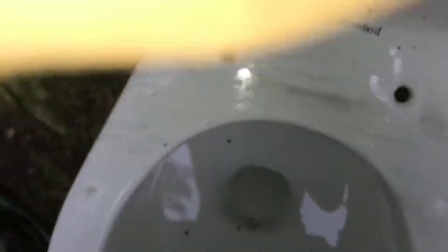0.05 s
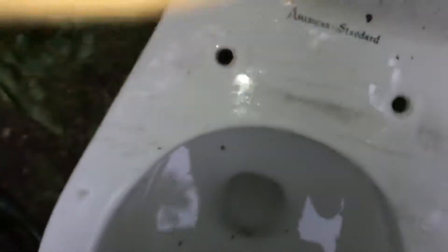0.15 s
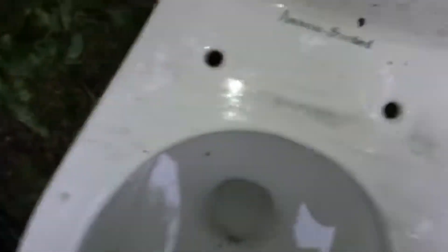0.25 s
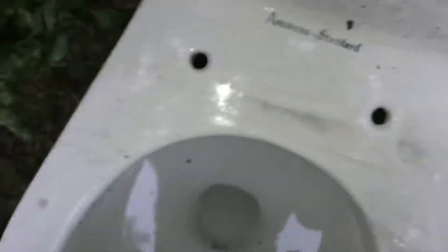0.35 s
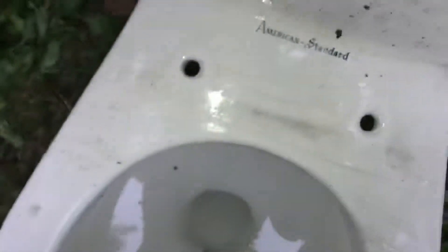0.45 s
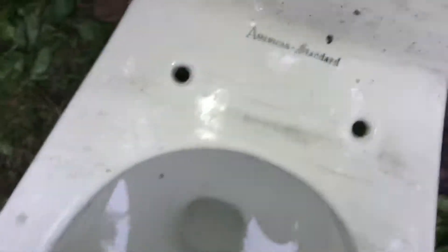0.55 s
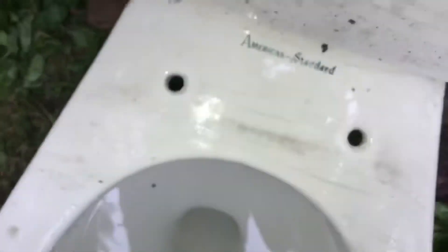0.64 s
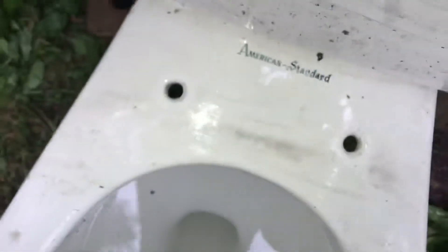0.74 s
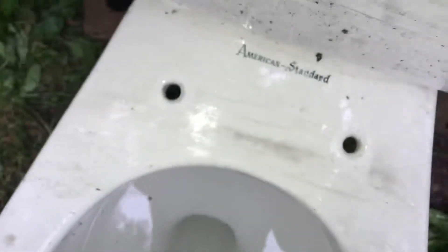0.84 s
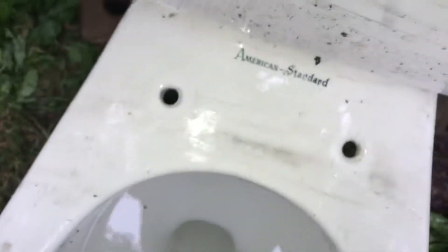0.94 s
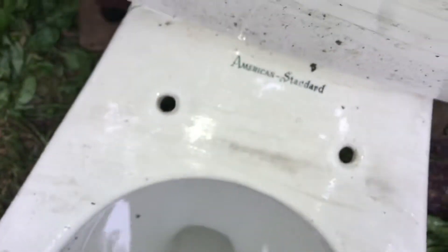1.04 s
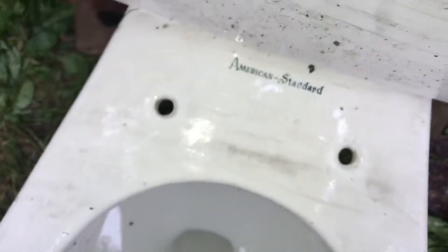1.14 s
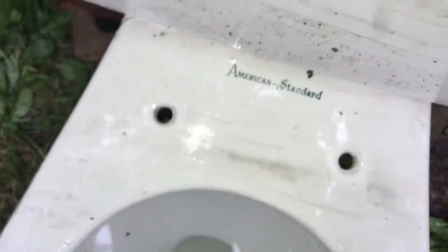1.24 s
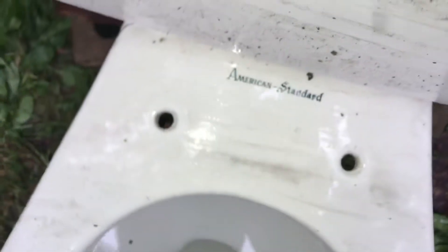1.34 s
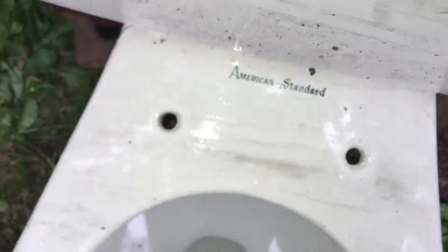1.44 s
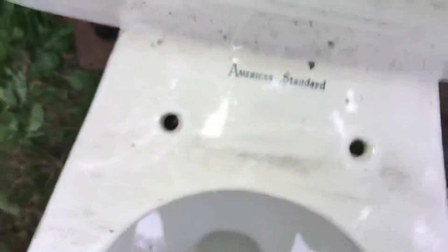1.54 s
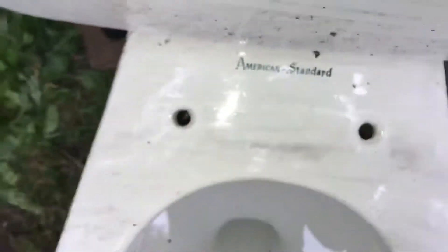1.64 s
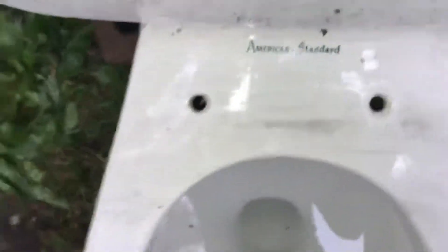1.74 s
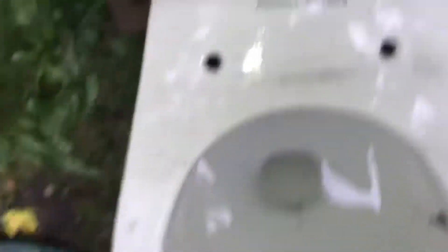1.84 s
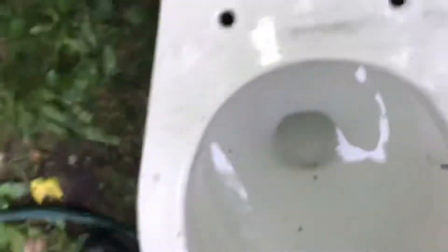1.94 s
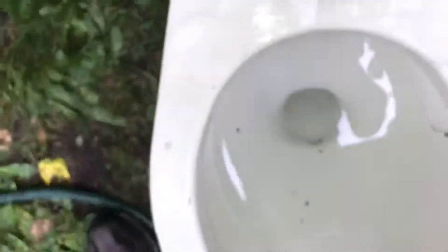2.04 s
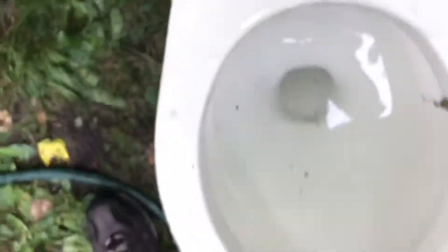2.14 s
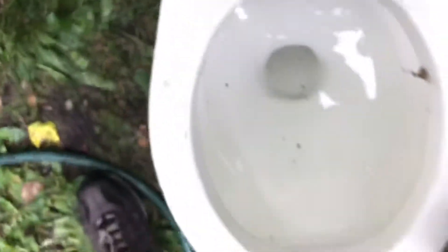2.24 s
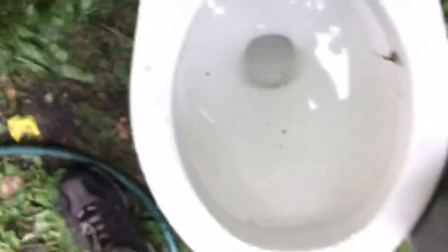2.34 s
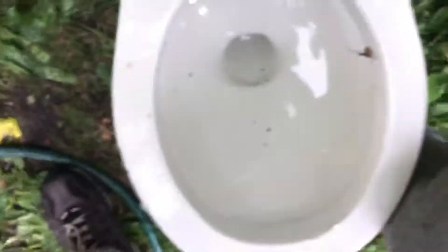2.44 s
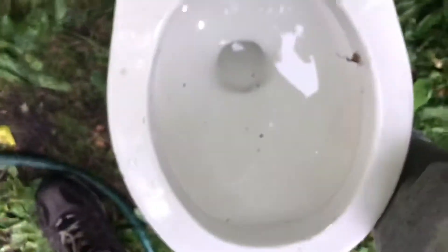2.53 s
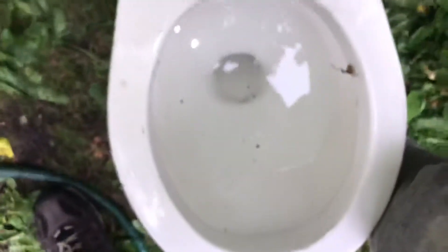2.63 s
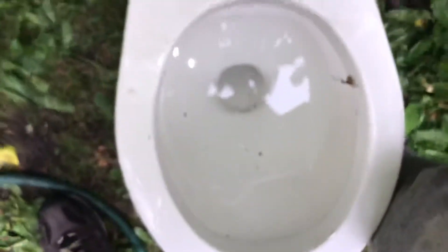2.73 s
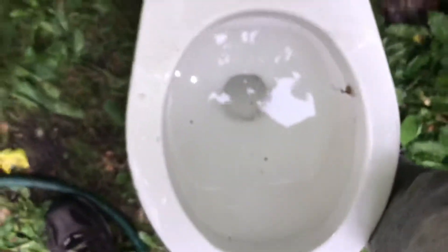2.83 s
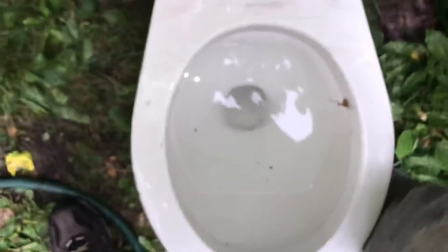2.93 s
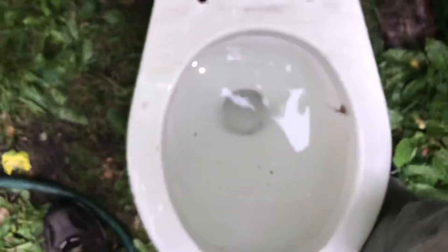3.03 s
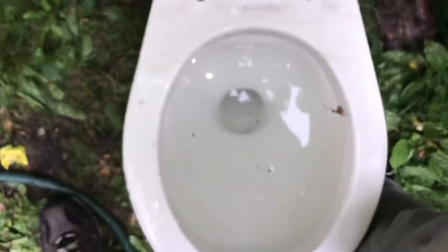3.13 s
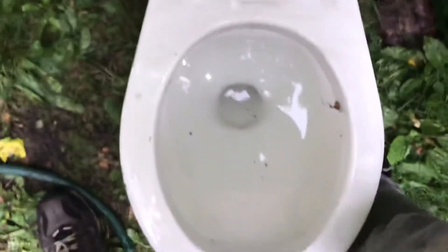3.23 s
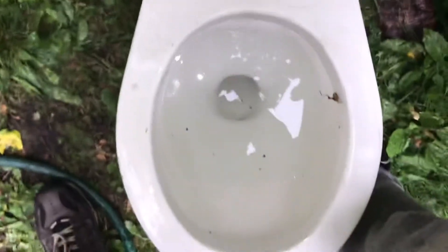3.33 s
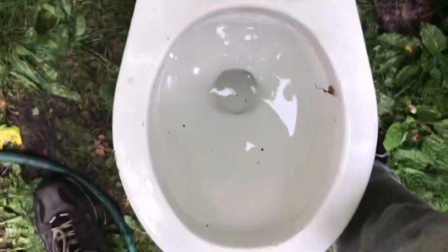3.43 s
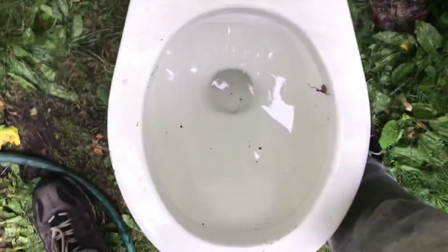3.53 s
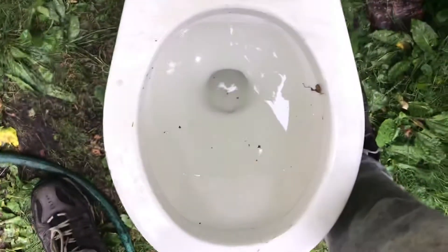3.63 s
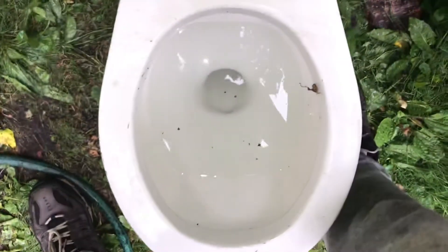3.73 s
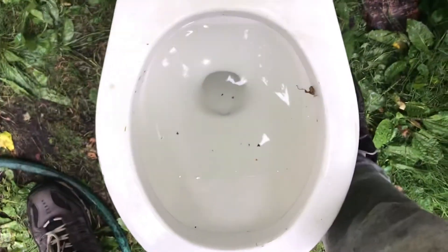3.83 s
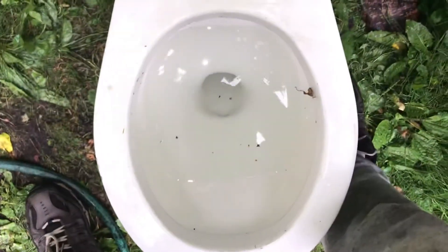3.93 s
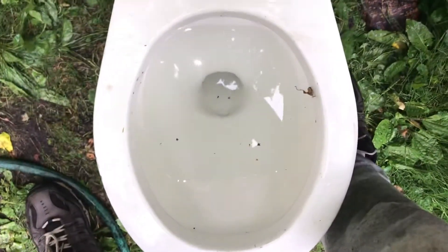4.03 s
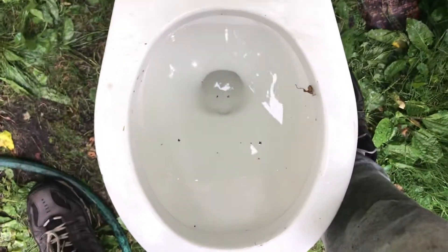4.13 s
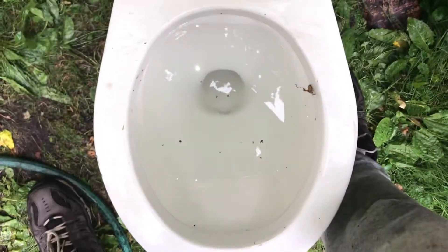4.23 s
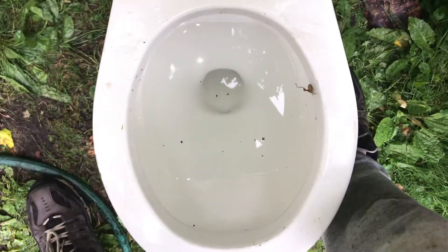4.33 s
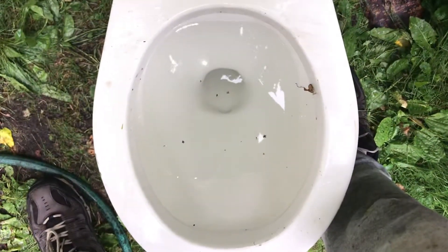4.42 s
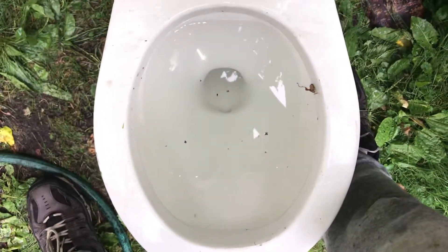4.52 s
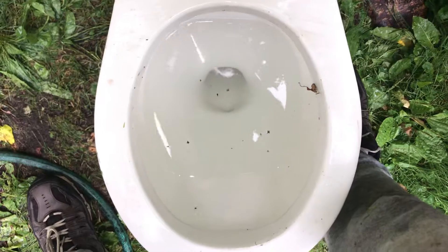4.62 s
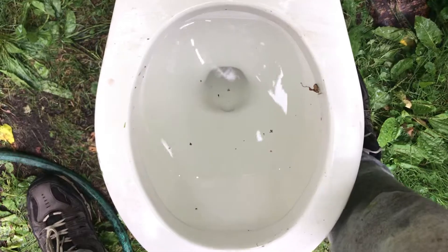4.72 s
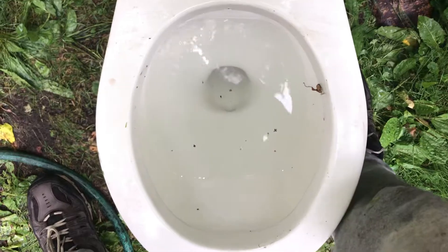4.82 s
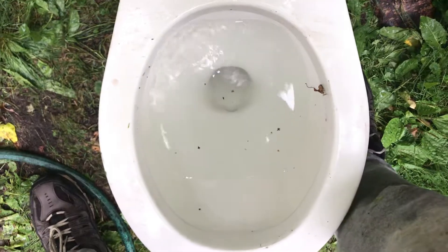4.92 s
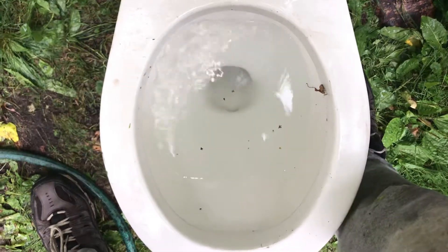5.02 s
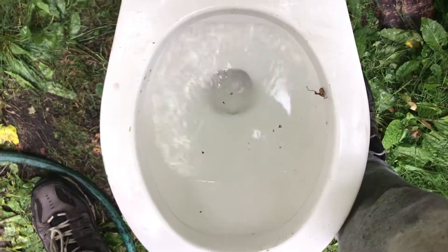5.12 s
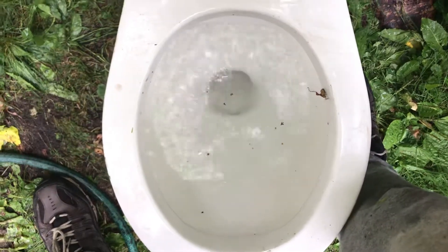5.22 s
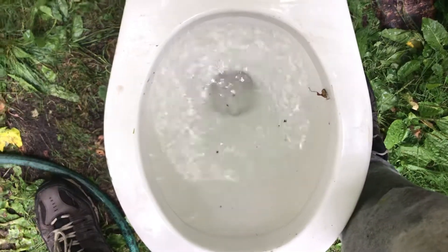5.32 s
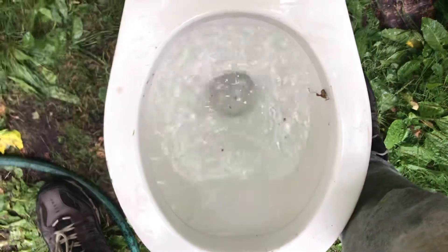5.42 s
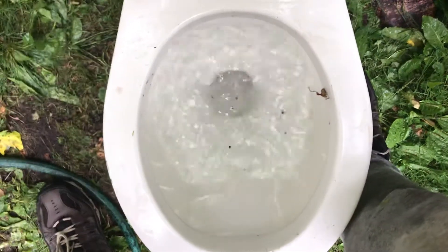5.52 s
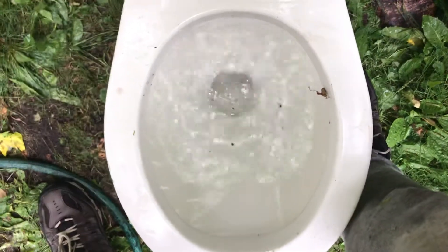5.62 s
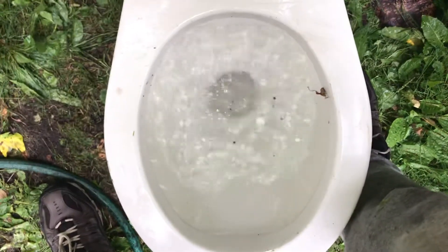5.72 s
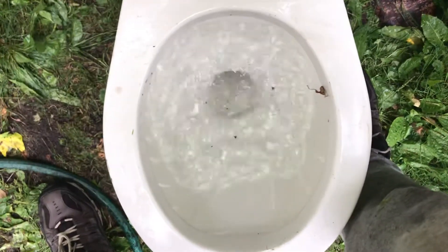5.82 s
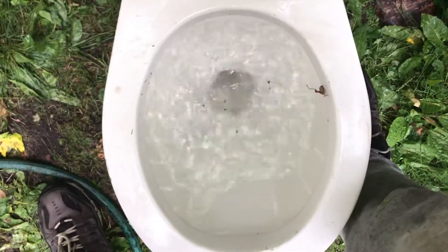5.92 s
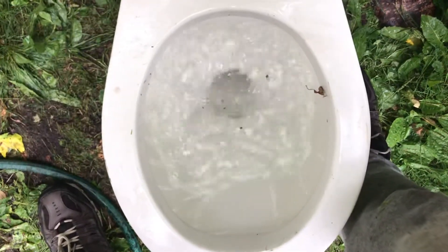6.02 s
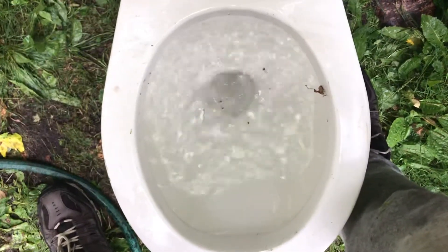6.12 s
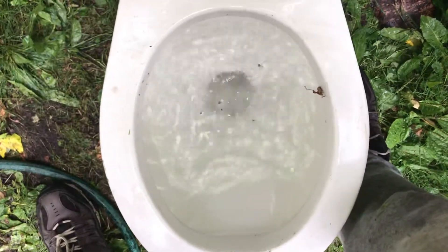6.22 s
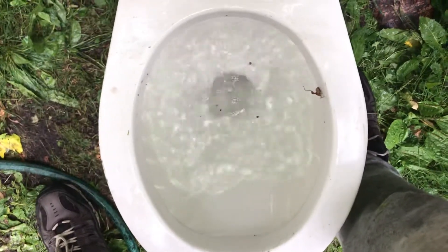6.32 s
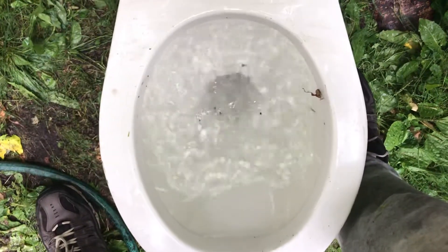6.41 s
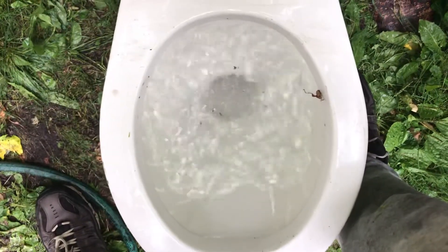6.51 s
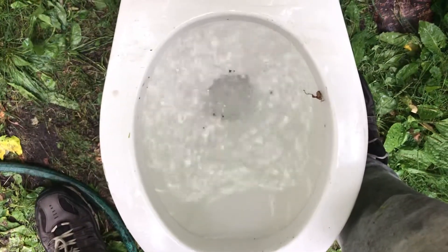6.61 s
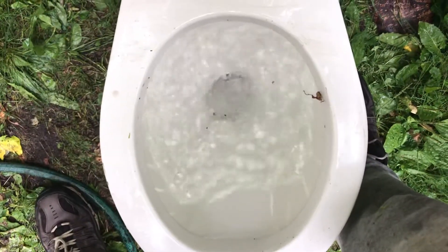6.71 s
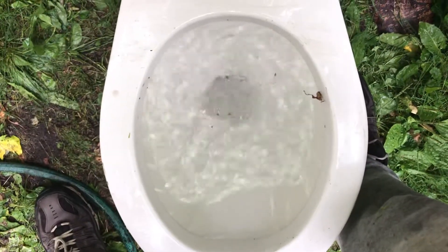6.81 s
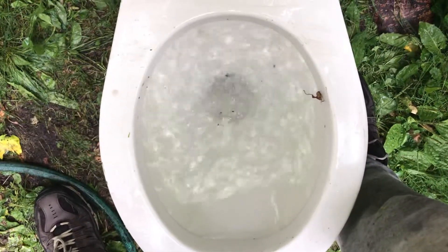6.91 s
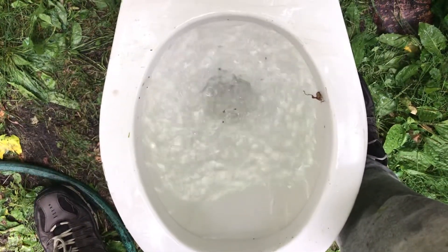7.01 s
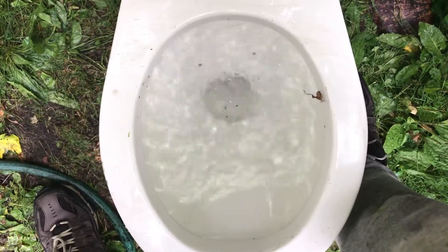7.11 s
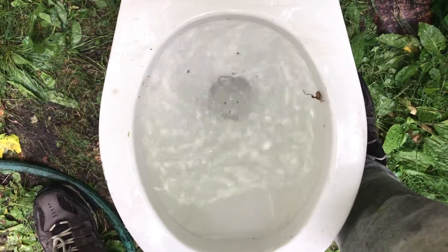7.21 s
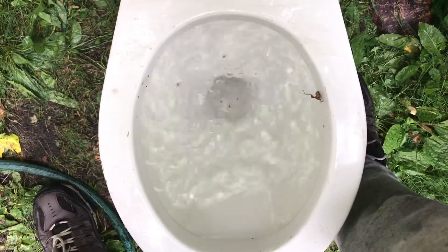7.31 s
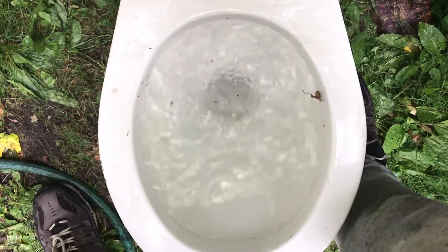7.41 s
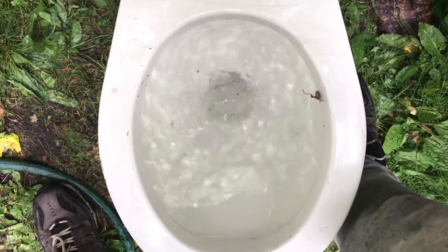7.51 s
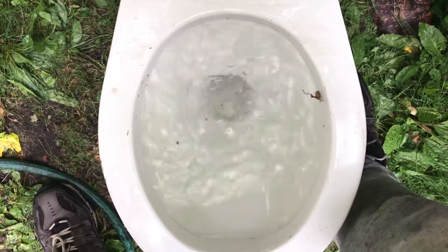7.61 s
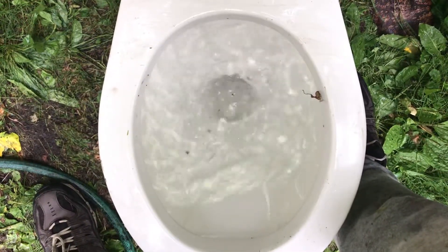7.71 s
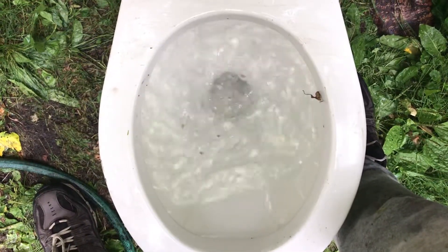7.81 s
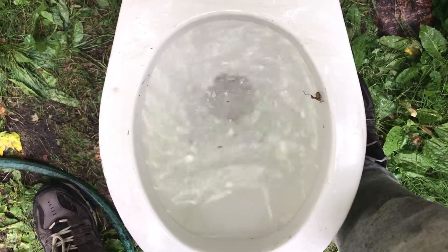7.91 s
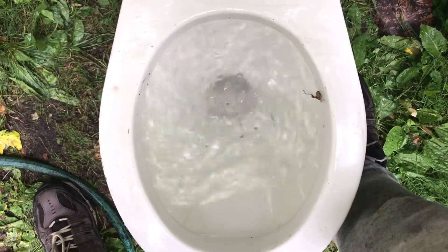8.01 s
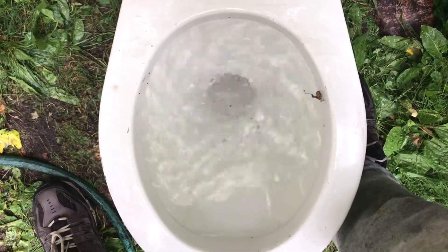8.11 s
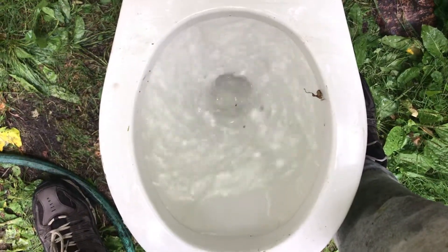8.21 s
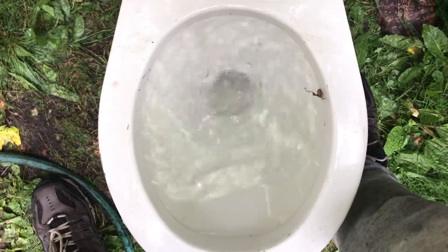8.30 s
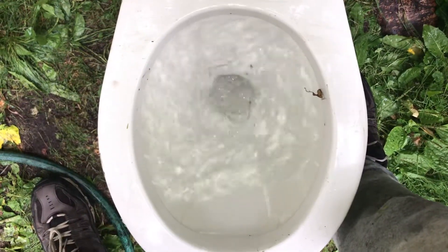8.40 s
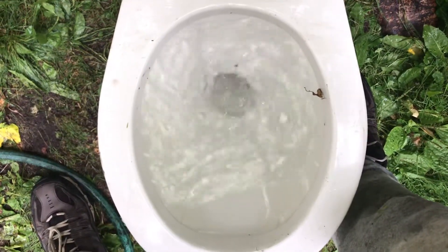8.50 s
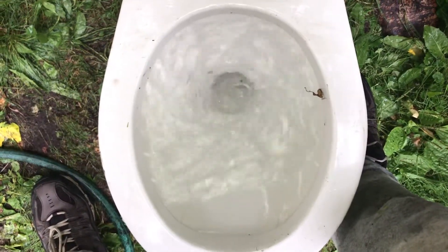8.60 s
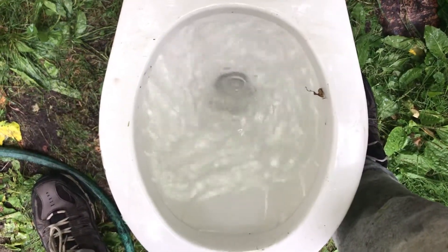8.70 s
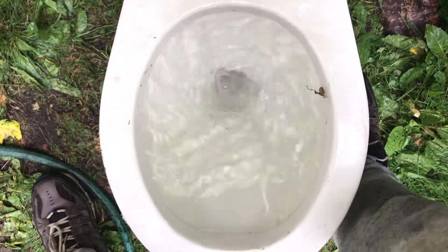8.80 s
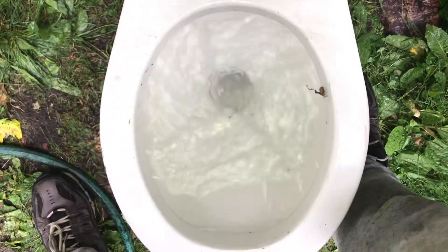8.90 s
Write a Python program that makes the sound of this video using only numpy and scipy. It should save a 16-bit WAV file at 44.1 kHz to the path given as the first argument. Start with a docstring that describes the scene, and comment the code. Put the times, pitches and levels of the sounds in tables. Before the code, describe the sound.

Outdoors in a garden, a handheld microphone sits close above a toilet bowl. For four seconds there is only faint hiss, thin trickling, scattered clear drips, light rustles, a few cloth rubs and dull handling knocks. Then air and water sputter through the rim, glugging and spitting, and burst into a strong, hollow, hissing flush. It chokes, surges again in short gurgling splashes, and cuts off at the end.

```python
"""Water trickles and drips in a toilet bowl in a garden, amid rustling, rubbing and far hiss; then it flushes.
Drips and bubbles are damped sines of rising pitch; sprays and jets are shaped noise mixed with bubbles.
Air and water sputter through the rim channel, whose pipe resonances colour hum, splash and jet hiss alike.
The flow chokes and surges again while the inlet tube splutters; knocks, rubs and low rumbles join in.
"""
import sys
import numpy as np
from scipy import signal
from scipy.fft import rfft, irfft, next_fast_len
from scipy.io import wavfile
from scipy.ndimage import uniform_filter1d, map_coordinates

SR = 44100
rng = np.random.default_rng(int(sys.argv[2]) if len(sys.argv) > 2 else 0)


def generate_wav(sig):
    """Save sig (samples, or channels by samples) to the path in sys.argv[1] as 16-bit PCM at SR."""
    pcm = np.round(np.clip(np.atleast_2d(sig).T, -1, 1) * 32767).astype(np.int16)
    wavfile.write(sys.argv[1], SR, pcm)


N = 394694

# spectra driving the channel, relative: f/Hz, level/dB
GURGLE_SPECTRUM = [(35, -46), (60, -10), (150, -7.5), (200, 4), (400, 4), (750, -7), (900, -16.5),
                   (1150, -17), (2000, -39), (5000, -74)]
SPLASH_SPECTRUM = [(300, 12.5), (750, 12.5), (900, 2.5), (1100, 4.5), (2200, 0), (3200, 2), (4500, 8),
                   (7000, -2), (15000, -65)]
JET_SPECTRUM = [(2060, -56), (3660, -8), (4230, -3.5), (4860, -10), (6530, 2), (7650, -2), (8300, 3),
                (10400, -3.5), (13200, -3), (15800, -5.5)]
SHAKE_DB = 1.5  # how far slugs shake the splash
SLOSH_HZ, SLOSH_SPREAD = 2460, 0.8  # brighter thrown water: centre, width in log units


def flush():
    """Source and resonator: air drives the channel low, splashes ring it higher, jets hiss from its holes."""
    hum_gain, splash_gain, slosh_gain, hiss_gain = flow()
    # at full flow single bubbles merge into a more even roar
    loose = 1 / (1 + (hiss_gain / amp(-37)) ** 2)
    surge = wobble(25)  # slugs of water shake hum, splash and jets together

    pushes = amp(0.85 * wobble(60) + 0.62 * surge) * rng.standard_normal(N)
    hum = filtered(pushes, lambda f: colour(GURGLE_SPECTRUM)(f) * channel(direct_db=-20)(f))

    drops = bubbles(count=5500, centre_hz=2214, spread=0.412, cycles=19.6,
                    spike_db=4.0, clump_db=1.12, since=FLOW_LEVELS[0][0])
    drops = water(drops, share=0.7 * loose, bed=patchy(2.5, size=4, order=5))
    shaken = amp(SHAKE_DB * surge) * drops
    splash = filtered(shaken, lambda f: colour(SPLASH_SPECTRUM)(f) * channel(direct_db=-9)(f))

    bright = lambda f: np.exp(-(np.log((f + 1) / SLOSH_HZ) / SLOSH_SPREAD) ** 2 / 2)
    thrown = filtered(drops, lambda f: bright(f) * channel(direct_db=-12)(f))

    fizz = bubbles(count=4000, centre_hz=6123, spread=0.458, cycles=59, spike_db=6.0, clump_db=2.5)
    fizz = water(fizz, share=0.41 * loose, bed=patchy(2.8, size=10, order=6))
    fizz = water(spatter(count=900, spike_db=3, t60=0.015), share=0.3 * loose, bed=fizz)
    jets = filtered(amp(0.97 * surge) * fizz, lambda f: colour(JET_SPECTRUM)(f) * channel(direct_db=-3)(f))
    return (hum_gain * unit(hum) + splash_gain * unit(splash)
            + slosh_gain * unit(thrown) + hiss_gain * unit(jets))


# steady flow under the surges: t/s, hum level/dB, splash level/dB, jet hiss level/dB
FLOW_LEVELS = [(4.15, -84, -111, -84), (4.27, -101, -74, -55.5), (4.4, -71, -46, -53),
               (4.56, -39, -53.5, -54.5), (4.8, -47, -49.5, -55), (5.1, -41, -49, -52),
               (5.36, -42.5, -47, -52), (5.65, -59, -43, -51), (7.18, -34, -45, -44.5),
               (7.29, -51.5, -43, -47), (7.43, -40, -44, -51), (7.72, -44.5, -45.5, -51),
               (7.86, -57, -44, -49.5), (8.4, -46.5, -44.5, -52), (8.6, -55, -49, -51),
               (8.66, -46, -43, -47), (8.95, -80, -40, -55)]
# air chokes through the channel until water shuts it:
# start t/s, end t/s, hum level at start/dB, hum level at end/dB, jet hiss level at start/dB
AIR_SURGES = [(4.438, 4.503, -47, -36, -69), (4.516, 4.62, -40, -38.5, -72),
              (4.725, 4.754, -36, -25.5, -59), (4.884, 5.113, -42, -50, -60), (5.131, 5.198, -37, -38, -42),
              (5.21, 5.245, -43, -39, -60), (5.37, 5.42, -24, -41, -49), (5.392, 7.187, -24, -30.5, -38),
              (7.45, 7.701, -36, -32, -45), (7.902, 8.064, -40, -39, -70), (8.068, 8.152, -35, -32.5, -47),
              (8.157, 8.229, -38, -39, -66), (8.258, 8.297, -33, -47, -65), (8.854, 8.953, -38, -40.5, -52)]
SURGE_OPEN_S, SURGE_SHUT_S = 0.0042, 0.0032  # time to change by 10 dB
KICK_DB, KICK_S = 5, 0.021  # extra push after the channel opens, and when it peaks
# water thrown into the bowl: start t/s, end t/s, splash level/dB, jet hiss level/dB
THROWN_WATER = [(4.732, 4.768, -40, -45), (4.909, 4.924, -39, -38), (4.951, 4.966, -41, -40),
                (5.16, 5.236, -53.5, -66), (5.378, 5.603, -37, -36), (5.828, 6.06, -56, -42),
                (7.197, 7.203, -45, -62), (7.212, 7.244, -39, -54), (7.266, 7.269, -42, -57),
                (7.355, 7.377, -42, -52), (7.389, 7.405, -40, -48), (7.409, 7.42, -42, -44),
                (7.429, 7.449, -44, -46), (7.702, 7.743, -45.5, -52), (7.757, 7.776, -38.5, -61),
                (7.814, 7.845, -47, -51), (7.912, 7.939, -44.5, -51), (7.96, 7.986, -46, -47),
                (8.013, 8.053, -41.5, -63), (8.147, 8.176, -47, -59), (8.229, 8.229, -47, -64),
                (8.25, 8.254, -46, -62), (8.298, 8.34, -50.5, -67), (8.409, 8.415, -53, -41.5),
                (8.658, 8.675, -49, -57), (8.774, 8.794, -55, -59)]
SLOSH_RISE_S, SLOSH_FALL_S = 0.0016, 0.0059  # time to change by 10 dB


def flow():
    """Intermittent flow: surge hum gains add to the steady flow, jet gains add as powers."""
    hum, splash, hiss = levels(FLOW_LEVELS)
    a, b, first_db, last_db, jet_db = np.transpose(AIR_SURGES)
    hum = hum + spells(a, b, first_db, last_db, SURGE_OPEN_S, SURGE_SHUT_S, KICK_DB, KICK_S)
    surge_hiss = spells(a, b, jet_db, jet_db + last_db - first_db, SURGE_OPEN_S, SURGE_SHUT_S)
    hiss = np.hypot(hiss, surge_hiss)

    a, b, splash_db, jet_db = np.transpose(THROWN_WATER)
    slosh = spells(a, b, splash_db, splash_db, SLOSH_RISE_S, SLOSH_FALL_S)
    slosh_hiss = spells(a, b, jet_db, jet_db, SLOSH_RISE_S, SLOSH_FALL_S)
    return hum, splash, slosh, np.hypot(hiss, slosh_hiss)


# air column of the rim channel: f/Hz, width/Hz, level/dB
CHANNEL_MODES = [(196, 330, -13.5), (330.7, 44.6, -3.5), (743, 68, -1.5), (1126, 52, 1.5), (1295, 36, -3.5),
                 (1438, 10, 0.5), (1700, 17, -6), (1807, 20, -2), (2157, 95, -2.5), (2498, 40, -1),
                 (2887, 100, -7), (3144, 42, 0.5), (4050, 110, -14), (5240, 85, -5.5), (6400, 65, -19),
                 (8560, 45, -24)]


def channel(direct_db):
    """Modal superposition: resonances of the air column plus the sound that bypasses it."""
    def response(f):
        modes = sum(amp(db) * 1j * f * width / (centre * centre - f * f + 1j * f * width)
                    for centre, width, db in CHANNEL_MODES)
        return modes + amp(direct_db)
    return response


# water slugs that burst in the channel, levels nominal:
# t/s, level/dB, bubble f/Hz, thump and crack level/dB relative to the slug
SLUG_BURSTS = [(4.441, -11, 1240, -22, -49), (4.461, -11, 1280, -28, -33), (4.479, -8, 1330, -27, -39),
               (4.508, -9, 726, -4, -40), (4.731, 6, 1016, -30, -18), (4.75, -13.5, 1170, -1, -7),
               (4.776, -11.5, 1056, -11, -25), (4.847, -10.5, 1140, -13.5, -25),
               (4.956, -14.5, 1130, -7, -11), (5.076, -29, 1070, 8, -13), (5.131, -1, 6900, -21.5, -27),
               (5.144, -30.5, 1190, 16, -26), (5.182, -12, 1670, -2.5, -36), (5.214, -9.5, 1720, -8, -41),
               (5.294, -22, 1690, 6, -26), (5.761, -6, 6520, -30, -23), (5.931, -16.5, 746, -8, 1.5),
               (6.046, -17.5, 1090, 6.5, -23), (6.146, -6, 6600, -26, -22), (6.815, -6.5, 3980, -36, -15),
               (6.96, -18, 1140, -2, -23), (7.129, -8.5, 4160, -30, -13.5), (7.314, -12, 774, -21, -19),
               (7.612, -18, 1030, 5, -17), (7.641, -1.5, 6800, -25, -22), (7.739, -1.5, 3160, -40, -27),
               (7.8, -5, 3970, -37, -30), (7.972, -9.5, 2140, -11, -20), (8.364, -8.5, 1216, -20.5, -23),
               (8.264, -8, 2120, -38, -41), (8.288, -12, 2095, -38, -35), (8.466, -17, 1130, -32, -11),
               (8.757, -8.5, 2480, -34, -36), (8.83, 2, 4600, -47, -24), (8.905, -12.5, 1170, -19, -33)]


def bursts():
    """Impulsive excitation: a slug's crack of spray, bubble and low push all ring the channel."""
    s, db, hz, thump_db, crack_db = np.transpose(SLUG_BURSTS)
    pop = blips(s + 0.001635, hz, amp(db - 13), cycles=17.7, rise=0.018)
    push = blips(s + 0.0018, np.full(len(s), 340.), amp(db + thump_db + 6.5), cycles=2.4, rise=0)
    short_crack = puffs(s + 0.0022, amp(db + crack_db - 8.0), t60=0.0084)
    long_crack = puffs(s + 0.0015, amp(db + crack_db - 9.0), t60=0.032)
    spit = colour([(700, -24), (2000, -2.0), (4000, 6.0), (9000, 1.5), (16000, -13.0)])
    ring = filtered(short_crack + long_crack, lambda f: spit(f) * channel(direct_db=-3)(f))
    return filtered(pop, channel(direct_db=-8.0)) + filtered(push, channel(direct_db=-10.0)) + ring


# resonances of the inlet tube: centre f/Hz, nominal level/dB
INLET_MODES = [(1150, -2), (1760, -11), (2170, -7), (2620, -18.5), (3270, -10), (4250, -14.5), (5250, -14),
               (6200, -22)]
# air trapped in the inlet as it fills, and a last sinking glug: t/s, pocket f/Hz, nominal level/dB
AIR_POCKET = [(4.33, 622, -72), (4.429, 447.7, -39), (4.49, 480, -46.5), (4.789, 420, -37.5),
              (4.84, 606, -57), (4.864, 616.4, -37), (4.905, 486, -37.5), (4.95, 409.4, -37),
              (5.042, 519, -36), (5.15, 618, -69), (8.15, 262, -79), (8.19, 200, -45), (8.35, 110, -44.5),
              (8.42, 100.2, -68)]
# air spits through the inlet tube: start t/s, end t/s, nominal level/dB
AIR_SPITS = [(4.315, 4.339, -50.5), (4.345, 4.437, -44), (4.593, 4.654, -49.5), (4.783, 5.039, -47.5),
             (4.87, 4.903, -40.5), (4.918, 4.926, -35), (4.959, 4.966, -34), (4.992, 5.013, -40)]
SPIT_RISE_S, SPIT_FALL_S = 0.0068, 0.0085  # time to change by 10 dB
SPIT_RATE, SPIT_T60, SPIT_BED = 48, 0.052, 0.31  # middle bubble rate /s, decay s, steady part
TUBE_WAVER = 0.025  # scale of the tube's relative pitch wander


def splutter():
    """Resonance of enclosed air: bubbles ring the short inlet tube while a pocket glides in pitch."""
    s, *cols = np.transpose(AIR_POCKET)
    pocket_hz, pocket_db = [np.interp(np.arange(N) / SR, s, c) for c in cols]
    tube = np.zeros(N)
    for hz, db in INLET_MODES:
        gain = amp(db + 4.4 * wobble(30))
        tube += gain * narrow(hz * (1 + TUBE_WAVER * wobble(12)), width_hz=90 + 0.07 * hz)

    # each whole beat starts a bubble, at an uneven rate
    beats = np.cumsum(SPIT_RATE * amp(3.3 * wobble(30))) / SR
    since = beats % 1 / SPIT_RATE
    decay = amp(-60 * since / SPIT_T60 + 2.0 * wobble(54))
    beads = SPIT_BED + unit((1 - np.exp(-since / 0.0022)) * decay)

    sounding = (np.arange(N) > s[0] * SR) & (np.arange(N) < s[-1] * SR)
    a, b, db = np.transpose(AIR_SPITS)
    spits = spells(a, b, db, db, SPIT_RISE_S, SPIT_FALL_S)
    pocket = sounding * amp(pocket_db) * narrow(pocket_hz, width_hz=86)
    return unit(beads) * (spits * tube + pocket)


# fine spray off the rim: t/s, nominal level/dB
RIM_SPRAYS = [(7.291, -27), (7.5184, -24), (7.6687, -24), (8.3565, -29.5), (8.445, -27), (8.5225, -31),
              (8.891, -29), (8.9144, -22)]
SPRAY_T60, SPRAY_LOW_HZ = 0.02, 7950  # decay s, high-pass corner


def sprays():
    """Decaying broadband noise: scattering droplets hiss briefly above a second-order high-pass."""
    s, db = np.transpose(RIM_SPRAYS)
    return filtered(puffs(s, amp(db), SPRAY_T60), lambda hz: (1j * hz / (SPRAY_LOW_HZ + 1j * hz)) ** 2)


# single drips, levels nominal: t/s, level/dB, f/Hz, spray level/dB relative to the drip
SINGLE_DRIPS = [(0.342, -40.5, 3700, -12), (0.755, -38, 2920, -38), (1.084, -42.5, 6110, -7),
                (1.105, -36, 6800, -33), (1.265, -43, 1700, -33), (1.309, -41.5, 3570, -14),
                (1.385, -40, 1740, -27), (1.515, -44, 1190, -27), (2.061, -41.5, 3880, -12),
                (1.796, -42, 3020, -29), (1.844, -43, 3060, -20), (1.885, -47, 2000, -27),
                (1.905, -34.5, 2070, -26), (1.935, -48, 1600, -31), (2.006, -44, 1990, -9),
                (2.152, -40, 6800, -24), (2.261, -39, 3380, -27), (2.278, -40, 2720, -15),
                (2.445, -38, 1260, -20), (2.675, -40, 2640, -26), (2.747, -40.5, 1240, -38),
                (2.784, -40, 4430, -33), (2.94, -47.5, 1950, -6), (3.192, -43, 1920, -35),
                (3.263, -38, 4510, -15), (3.453, -43, 3230, -16), (3.588, -47.5, 1260, -12),
                (3.681, -42, 3180, -11.5), (3.797, -38.5, 3000, -16), (3.852, -37, 2900, -37),
                (4.097, -44, 2880, -23), (4.24, -40.5, 5100, -6.5)]


def drips():
    """Bubble resonance and reflection: clear drips with a spit of spray, echoed by the bowl's far wall."""
    s, db, hz, spray_db = np.transpose(SINGLE_DRIPS)
    drop = blips(s, hz, amp(db - 3.0), cycles=16.0, rise=0.019)
    echo = blips(s + 0.0036, hz, amp(db - 5), cycles=20, rise=0.01)
    spit = puffs(s, amp(db + spray_db - 2.0), t60=0.016) + puffs(s, amp(db + spray_db - 1.5), t60=0.094)
    spray = colour([(1000, -22.0), (2500, 4.0), (5000, 2.5), (10000, 2.0), (16000, -27)])
    return drop + echo + filtered(spit, spray)


# before the flush: t/s, trickle level/dB, rustle level/dB
CALM_LEVELS = [(0.0, -64, -64), (1.1, -64.5, -63), (1.3, -62, -67), (1.6, -60, -66), (1.7, -69, -60),
               (2, -65, -62.5), (4.2, -66, -63.5), (4.3, -63, -55)]
# relative spectra: f/Hz, level/dB
TRICKLE_SPECTRUM = [(350, -10), (600, 5), (797, -11.5), (1150, -2.5), (1420, -9), (1720, -0.5), (3020, -4),
                    (5000, -4.5), (6500, -36), (11000, -120)]
RUSTLE_SPECTRUM = [(1470, -67), (2500, -16), (3060, -3.5), (4530, -1.5), (5010, -7), (6070, -2.5),
                   (10500, -11), (15800, -7.5)]


def calm():
    """Random superposition: bubbles make a thin trickle, sharp ticks a rustle of leaves and cloth."""
    trickle_gain, rustle_gain = levels(CALM_LEVELS)
    run = bubbles(count=4000, centre_hz=2095, spread=0.363, cycles=20, spike_db=5.5, clump_db=5)
    run = water(run, share=0.47, bed=patchy(5.2, size=3, order=5))
    run = filtered(run, lambda f: colour(TRICKLE_SPECTRUM)(f) * channel(direct_db=3)(f))
    ticks = spatter(count=500, spike_db=4.5, t60=0.025)
    ticks = water(ticks, share=0.45, bed=patchy(4, size=30, order=3))
    return trickle_gain * unit(run) + rustle_gain * unit(filtered(ticks, colour(RUSTLE_SPECTRUM)))


# dull knocks of a hand on the phone: t/s, nominal level/dB, f/Hz
HAND_KNOCKS = [(0.574, -49, 380), (2.844, -51, 584), (3.864, -56, 646)]


def knocks():
    """Heavy damping: a blow dies within a few cycles, with a dull thud of noise."""
    s, db, hz = np.transpose(HAND_KNOCKS)
    dull = colour([(60, -13), (300, 4), (1200, 1.0), (3000, -16)])
    thud = filtered(puffs(s, amp(db + 11.0), t60=0.056), dull)
    return blips(s, hz, amp(db - 9), cycles=3.6, rise=0) + thud


# cloth or skin rubbing near the phone: start t/s, end t/s, nominal level/dB, first f/Hz, last f/Hz
RUB_STROKES = [(0.052, 0.333, -59, 730, 3320), (.51, 0.569, -58, 10000, 9000),
               (0.72, 0.872, -52, 3460, 1560), (1.674, 1.81, -61.5, 1500, 496),
               (2.328, 2.51, -56, 3640, 1420), (2.694, 2.882, -61.5, 1500, 1510)]


def rubs():
    """Friction noise: scratchy strokes swell and fade as their colour crossfades from first to last."""
    out, grit = np.zeros(N), patchy(4.3, size=4, order=4)
    for start, end, db, first_hz, last_hz in RUB_STROKES:
        a, b = round(start * SR), round(end * SR)
        u, f = np.linspace(0, 1, b - a), np.fft.rfftfreq(b - a, 1 / SR)
        swell = np.sin(np.pi * u ** 2.0) ** 0.5
        for hz, weight in ((first_hz, 1 - u), (last_hz, u)):
            band = np.exp(-(np.log((f + 1) / hz) / 0.78) ** 2)
            scratch = irfft(rfft(grit[a:b]) * band, b - a)
            out[a:b] += amp(db) * np.sqrt(weight) * swell * unit(scratch)
    return out


# relative spectra of low rumble and outdoor hiss: f/Hz, level/dB
RUMBLE_SPECTRUM = [(15, -40), (25, 9), (54, 12), (135, -1), (215, 1), (300, 0), (390, -34), (660, -120)]
GARDEN_SPECTRUM = [(35, -27), (60, 8), (337, 2), (762, -7.5), (1570, -10), (1890, -16), (3020, -12),
                   (4490, -40), (4920, -15), (6360, -14.5), (15800, -25.5)]
GARDEN_DB = -67.5
# low thumps and rumbles: start t/s, end t/s, level/dB
LOW_RUMBLES = [(0.184, 0.222, -58.5), (1.8, 1.817, -60), (3.623, 3.785, -63), (8.097, 8.314, -54)]
FAINT_RUMBLE_DB = -72  # level that never stops
RUMBLE_RISE_S, RUMBLE_FALL_S = 0.047, 0.037  # time to change by 10 dB


def garden():
    """Stationary and modulated noise: far outdoor hiss; low thumps and rumbles swell over a faint one."""
    rumble = filtered(amp(2.0 * wobble(22)) * rng.standard_normal(N), colour(RUMBLE_SPECTRUM))
    a, b, db = np.transpose(LOW_RUMBLES)
    rumble_gain = amp(FAINT_RUMBLE_DB) + spells(a, b, db, db, RUMBLE_RISE_S, RUMBLE_FALL_S)
    hiss = filtered(rng.standard_normal(N), colour(GARDEN_SPECTRUM))
    return amp(GARDEN_DB) * unit(hiss) + rumble_gain * unit(rumble)


def blips(s, hz, gain, cycles, rise):
    """Bubble resonance: quickly starting damped sines whose pitch rises, unless rise is 0, as they die."""
    t = np.arange(800) / SR
    turns = t * hz[:, None]
    shape = (1 - np.exp(-turns / 0.18)) * np.exp(-3 * turns / cycles)
    phase = 2 * np.pi * turns * (1 + rise * np.minimum(turns / cycles, 2))
    wave = gain[:, None] * shape * np.sin(phase)
    at = (s * SR).astype(int)[:, None] + np.arange(len(t))
    return np.bincount(at.ravel(), wave.ravel(), N + len(t))[:N]


def bubbles(count, centre_hz, spread, cycles, spike_db, clump_db, since=0):
    """Random superposition: a crowd of bubbles of uneven pitch and strength; rms 1."""
    when = clumped(count, clump_db, rate=30, since=since)
    pitch, size = rng.standard_normal((2, count))
    hz = np.clip(centre_hz * np.exp(spread * pitch), 950, SR / 3)
    return unit(blips(when, hz, amp(spike_db * size), cycles, rise=0.061))


def water(grains, share, bed):
    """Power sharing: grains such as bubbles or ticks mix with a bed at constant total power."""
    share = np.clip(share, 0, 1)
    return np.sqrt(share) * grains + np.sqrt(1 - share) * bed


def spatter(count, spike_db, t60):
    """Impulsive noise: sharp ticks, such as droplets breaking, come in clumps; rms 1."""
    when = clumped(count, clump_db=6, rate=6)
    return unit(puffs(when, amp(spike_db * rng.exponential(size=count)), t60))


def puffs(s, gain, t60):
    """Exponential decay: sudden bursts of noise fall by 60 dB in t60 seconds."""
    kick = np.bincount((s * SR).astype(int), gain, N)
    decay = amp(-60 * np.arange(4000) / SR / t60)
    return signal.fftconvolve(kick, decay)[:N] * rng.standard_normal(N)


def patchy(depth_db, size, order):
    """Time-frequency modulation: noise gain drifts in patches, size bins wide and order frames long; rms 1."""
    z = signal.stft(rng.standard_normal(N + 256), nperseg=256)[2]
    field = uniform_filter1d(rng.standard_normal(z.shape), size, 0)
    field = uniform_filter1d(field, order, 1)
    return unit(signal.istft(z * amp(depth_db * unit(field)), nperseg=256)[1][:N])


def narrow(hz, width_hz):
    """Narrow-band noise: slow random quadrature gains on a carrier that glides along hz; rms 1."""
    phase = 2 * np.pi * np.cumsum(hz) / SR
    return unit(wobble(width_hz) * np.cos(phase) + wobble(width_hz) * np.sin(phase))


def clumped(count, clump_db, rate, since=0):
    """Uneven event density: random moments (s) crowd together and thin out."""
    density = amp(clump_db * wobble(rate)) * (np.arange(N) >= since * SR)
    odds = np.cumsum(density)
    return np.searchsorted(odds, rng.random(count) * odds[-1]).clip(0, N - 1) / SR


def spells(start, end, first_db, last_db, rise_s, fall_s, kick_db=0, kick_s=1):
    """Exponential onset and release: gains rise, drift from first to last level, and fall."""
    t, out = np.arange(N) / SR, np.zeros(N)
    for a, b, first, last in zip(start, end, first_db, last_db):
        near = slice(max(0, round((a - 6 * rise_s) * SR)), round((b + 6 * fall_s) * SR))
        u = t[near]
        since = np.maximum(u - a, 0) / kick_s
        db = np.interp(u, [a, b], [first, last]) + kick_db * since * np.exp(1 - since)
        out[near] += amp(db - 10 * np.maximum(a - u, 0) / rise_s - 10 * np.maximum(u - b, 0) / fall_s)
    return out


def levels(rows):
    """Logarithmic interpolation: one gain curve for each dB column, -120 dB outside the table."""
    s, *cols = np.transpose(rows)
    return [amp(np.interp(np.arange(N) / SR, s, c, left=-120, right=-120)) for c in cols]


def wobble(rate):
    """Band-limited fluctuation: a smooth random curve, rate knots a second."""
    knots = rng.standard_normal(int(N * rate / SR) + 4)
    return map_coordinates(knots, [np.arange(N) * rate / SR])


def filtered(x, response):
    """Linear filtering: the spectrum of x times a complex response of frequency."""
    m = next_fast_len(N + SR // 2)
    return irfft(rfft(x, m) * response(np.fft.rfftfreq(m, 1 / SR)), m)[:N]


def colour(points):
    """Spectral envelope: gain read from (f/Hz, level/dB) points on a log axis."""
    f, db = np.transpose(points)
    return lambda hz: amp(np.interp(np.log(hz + 1), np.log(f + 1), db))


def amp(db):
    """Level to amplitude ratio: 20 dB is a factor of ten."""
    return 10 ** (np.asarray(db) / 20)


def unit(x):
    """Power normalisation: scales x to rms 1."""
    return x / np.sqrt(np.mean(x ** 2) + 1e-20)


def scene():
    """Linear superposition: all sources add."""
    return (garden() + calm() + drips() + knocks() + rubs()
            + splutter() + flush() + bursts() + sprays())[None]


MIC_LOW_HZ, TOP_HZ = 29.5, 15900  # the microphone fades below the first; nothing is kept from the second up


def record(dry):
    """Band limitation: the phone loses the deepest bass and keeps nothing above its band limit."""
    return filtered(dry[0], lambda hz: (1j * hz / (MIC_LOW_HZ + 1j * hz)) ** 2 * (hz < TOP_HZ))[None]


dry = scene()
out = record(dry)
generate_wav(out)
```